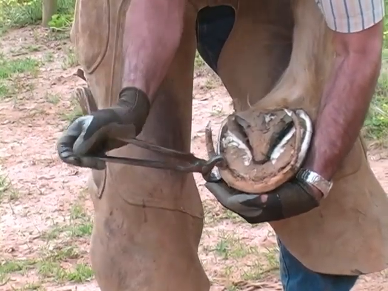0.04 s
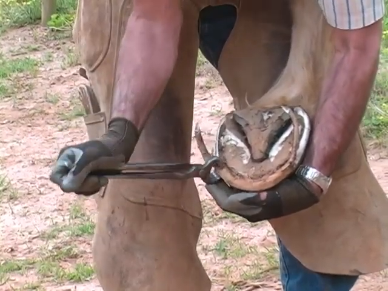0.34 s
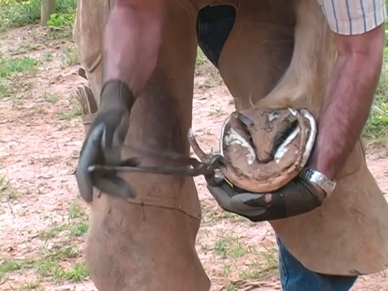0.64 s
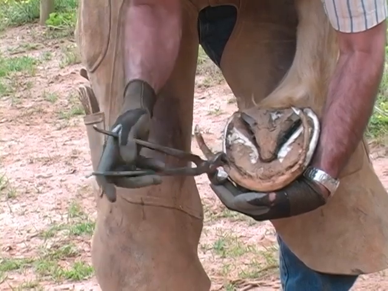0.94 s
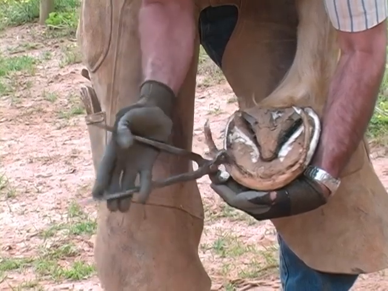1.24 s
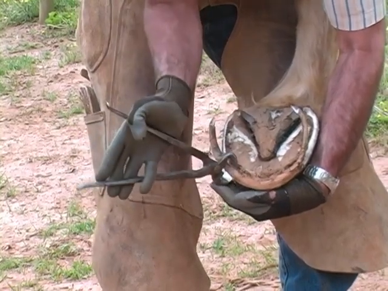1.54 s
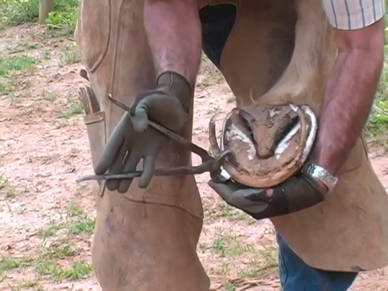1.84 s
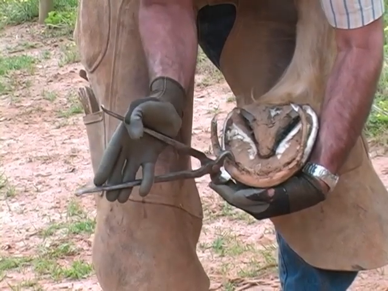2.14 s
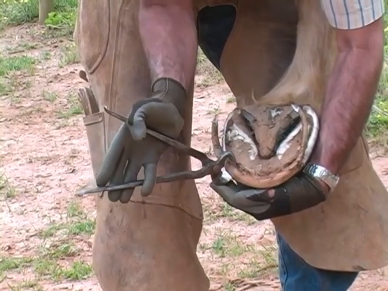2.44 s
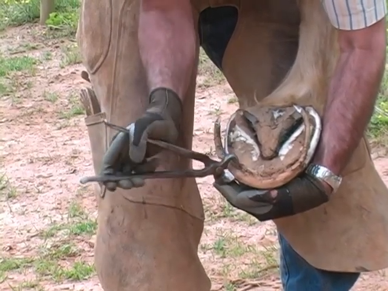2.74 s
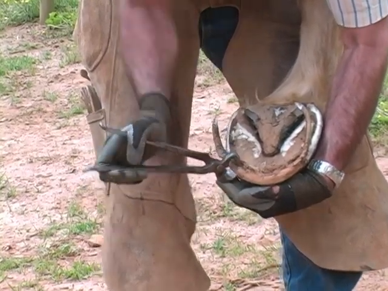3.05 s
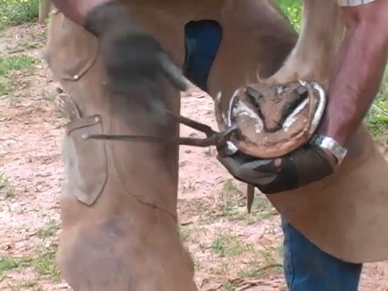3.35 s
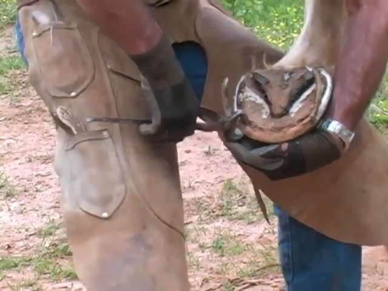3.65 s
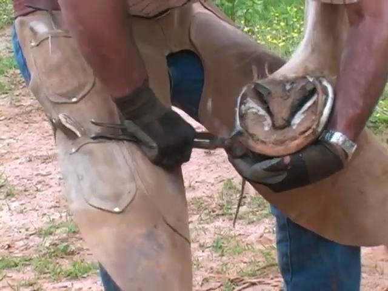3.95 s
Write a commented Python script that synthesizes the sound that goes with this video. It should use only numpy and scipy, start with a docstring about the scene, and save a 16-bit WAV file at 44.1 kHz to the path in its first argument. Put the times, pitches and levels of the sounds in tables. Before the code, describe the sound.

Nippers trim a horse's hoof close by, with a sharp snap at 0.3 seconds. The horn crackles lightly around 1.4 seconds and more strongly around 2.7. Gloves and leather chaps rustle softly and the tool ticks. A bird chirps twice just after 3 seconds. The loudest snap comes at 3.9 seconds, with a brief metallic ring and dull thud. Distant birdsong and a low outdoor rumble lie underneath.

```python
"""An open yard, with the microphone close to a hoof being trimmed with long-handled nippers.
The horn wall snaps twice under the jaws, ringing the tool and jolting the hoof, and crackles as the
jaws are worked in. Gloves and leather chaps rustle and the tool ticks against hoof and hand.
Birds sing in the distance, one chirps nearer, and a low outdoor rumble lies under it all."""
import sys
import numpy as np
from scipy import signal
from scipy.fft import rfft, irfft, next_fast_len
from scipy.io import wavfile
from scipy.ndimage import uniform_filter1d, map_coordinates

SR = 44100
rng = np.random.default_rng(int(sys.argv[2]) if len(sys.argv) > 2 else 0)


def transcribe(signal):
    """Save signal, clipped to [-1, 1], as a 16-bit WAV file at the path in sys.argv[1]."""
    frames = np.atleast_2d(signal).T
    limited = np.clip(frames, -1, 1)
    pcm = np.round(limited * 32767).astype(np.int16)
    wavfile.write(sys.argv[1], SR, pcm)


N = 176400
T = np.arange(N) / SR
HIT_T = np.arange(SR // 8) / SR  # seconds into one hit

# The jaws break through. Each row: start in seconds, level in dB, fracture length in seconds,
# relative ring level in dB, fracture t60 in seconds, relative tail level in dB, tail t60 in seconds.
BITES = [(0.2839, -21, 0.0027, 1, 0.014, -16, 0.04), (3.94, -4.5, 0.0015, -4, 0.0068, -9, 0.019)]


def amp(db):
    """Gain of a level in dB."""
    return 10 ** (np.asarray(db) / 20)


def unit(x):
    """Scaled to rms 1."""
    return x / np.sqrt(np.mean(x ** 2) + 1e-20)


def along(points, hz):
    """(Hz, value) points read on a log axis."""
    freqs, values = np.transpose(points)
    return np.interp(np.log(hz + 1), np.log(freqs + 1), values)


def add(track, start, x):
    """Mix x into the track from start, in seconds."""
    i = max(round(start * SR), 0)
    track[i:i + len(x)] += x[:len(track[i:])]


def wobble(rate):
    """A smooth random curve, rate knots a second."""
    return map_coordinates(rng.standard_normal(int(N * rate / SR) + 4), [T * rate])


def filtered(x, response):
    """x through a gain given as a function of frequency."""
    size = next_fast_len(N + SR // 4)
    return irfft(rfft(x, size) * response(np.fft.rfftfreq(size, 1 / SR)), size)[..., :N]


def panned(x, balance):
    """Stereo x leaned by (Hz, left minus right dB) points."""
    return filtered(x, lambda hz: amp(np.outer([.5, -.5], along(balance, hz))))


def coloured(x, points):
    """A short sound through a causal filter of unit energy, shaped by (Hz, dB) points."""
    n = 2 * len(x)
    gain = unit(amp(along(points, np.fft.rfftfreq(n, 1 / SR))))
    cepstrum = irfft(np.log(gain))
    cepstrum[1:n // 2] *= 2  # fold to minimum phase
    cepstrum[n // 2 + 1:] = 0
    return irfft(rfft(x, n) * np.exp(rfft(cepstrum)))[:len(x)]


def dying(t60):
    """Decay of a hit, 60 dB in t60 seconds."""
    return amp(-60 * HIT_T / t60)


def burst(envelope):
    """Noise under an envelope, evened out so that it holds all frequencies alike."""
    x = rng.standard_normal(len(envelope))
    for _ in range(4):
        phase = np.angle(rfft(x * envelope))
        x = irfft(np.exp(1j * phase), len(x))
    return unit(x * np.sqrt(envelope)) * np.sqrt(np.mean(envelope ** 2))


def ringing(modes):
    """Damped modes, a little different at each blow."""
    return sum(amp(db + rng.normal(0, 1)) * rng.choice([-1, 1]) * dying(t60)
               * np.sin(2 * np.pi * hz * HIT_T) for hz, db, t60 in modes)


def rush(spectrum, likeness):
    """Stereo noise of rms 1, from (Hz, dB) and (Hz, left-right likeness) points."""
    def mid_side(hz):
        angle = np.arccos(np.clip(along(likeness, hz), -1, 1)) / 2
        return amp(along(spectrum, hz)) * [np.cos(angle), np.sin(angle)]
    mid, side = filtered(rng.standard_normal((2, N)), mid_side)
    return unit(np.array([mid + side, mid - side]))


def swells(rows):
    """Bell-shaped strokes joined in one envelope."""
    return np.sqrt(sum((amp(db) * np.exp(-((T - peak) / half) ** 2)) ** 2 for peak, half, db in rows))


def steady(x, window_s=.22):
    """Noise without slow swells: only its quick flutter is left."""
    power = uniform_filter1d(np.mean(x ** 2, axis=0), round(window_s * SR))
    power = uniform_filter1d(power, round(window_s * SR / 2))
    return unit(x / np.sqrt(np.abs(power)))


def echo(x, t60):
    """Diffuse stereo reflections of unit energy."""
    t = np.arange(SR // 2) / SR
    tail = rng.standard_normal((2, len(t))) * amp(-60 * t / t60)
    return signal.fftconvolve(x[None], tail / np.linalg.norm(tail[0]), axes=1)[:, :N]


def snaps():
    """A fracture runs through the horn for a few milliseconds and rings the nippers."""
    # Colour of each bite, and the extra colour of the tails. Each point: frequency in Hz, level in dB.
    horn_colours = [
        [(150, -22), (800, -22), (1150, -31), (1900, 1.5), (2900, -9), (3700, 6), (5500, 9), (7400, 12.5),
         (9500, 6.5), (13000, 8.5), (14200, -5), (15500, -3), (17000, -22)],
        [(150, -31), (1400, -30), (2000, -17), (2900, -9), (3700, -4), (5400, 3.5), (7000, -2.5), (9000, 1),
         (10700, -1), (12600, 7.5), (13400, -12.5), (15300, -7), (17000, -47)],
    ]
    tail_colour = [(200, -10), (1500, 2.5), (5000, 26.5), (9000, 3), (12600, -17), (15000, -10)]
    # Modes of nippers and hoof, one list a bite. Each row: frequency in Hz, level in dB, t60 in seconds.
    bite_modes = [
        [(1365, -9, .022), (1850, -6, .018), (3540, -3, .02), (3775, -3, .022), (5170, 2, .024),
         (5930, -1, .022), (7445, 3, .016), (8275, -1, .014), (8845, 0, .016), (11380, -2, .014),
         (12640, -3, .012)],
        [(640, -20, .035), (800, -18, .035), (970, -15.5, .028), (1975, -14.5, .035), (2620, -11, .02),
         (2930, -18, .02), (3570, -7, .027), (5350, -2.5, .018), (6900, -7, .022), (7995, -7, .03),
         (8462, -8, .03), (8700, -9, .028), (9115, -8, .026), (9670, -6, .028), (11680, 0, .016),
         (12755, 0, .014), (14500, -12, .018)],
    ]
    out = np.zeros(N)
    for bite, colour, modes in zip(BITES, horn_colours, bite_modes):
        start, db, length, ring_db, t60, tail_db, tail_t60 = bite
        tear = burst(np.interp(HIT_T - length, HIT_T, dying(t60)))  # holds while the fracture runs
        tail = amp(tail_db) * coloured(burst(dying(tail_t60)), tail_colour)
        ring = ringing(modes) * (1 - np.exp(-3 * HIT_T / length))
        add(out, start, amp(db) * (coloured(tear + tail, colour) + amp(ring_db) * ring))
    return out


def thuds(push_s=.013):
    """Each snap jolts the hoof: one low push of air and a dull thud."""
    # One jolt a bite. Each row: thud delay in seconds, level in dB, t60 in seconds, push level in dB.
    jolts = [(0.00283, -33.5, 0.043, -49), (.001, -27.5, 0.048, -32)]
    # Colour of the thud. Each point: frequency in Hz, level in dB.
    thud_colour = [(100, -8), (200, 2), (300, -4), (600, -7), (950, 3.5), (1300, -3), (2000, 1),
                   (3000, -1.5), (8000, -40)]
    out, u = np.zeros(N), HIT_T / push_s
    for (start, *_), (delay, db, t60, push_db) in zip(BITES, jolts):
        add(out, start + delay, amp(db) * coloured(burst(dying(t60)), thud_colour))
        add(out, start, amp(push_db) * (1 - u / 2) * np.exp(-u))
    return out


def cracks(scatter_db=-24, scatter_t60=.018):
    """Horn cracks in the jaws: one sharp tick each time and a hollow knock of the hoof."""
    # Each row: start in seconds, tick level in dB, knock level in dB before halving, knock pitch ratio.
    small_cracks = [(0.2925, -20, -50, 1.4), (0.2948, -24, -46, 1.3), (0.2982, -28, -44, 1.4),
                    (1.404, -28, -46, 0.92), (1.428, -30, -37, 0.82), (1.433, -38, -42, 1),
                    (1.461, -27, -37.5, 0.93), (1.469, -32, -53, 0.93), (1.496, -31.5, -40.5, .9),
                    (2.6261, -28, -62, 1), (2.633, -27, -39.5, 1.7), (2.650, -36, -44, 1.7),
                    (2.6564, -19.5, -30, 1.03), (2.6624, -24, -27.5, 1.05), (2.6644, -20, -32, 1.03),
                    (2.6787, -11.5, -25.5, 0.94), (2.696, -41, -64, 1), (2.699, -39, -66, 1),
                    (2.703, -33, -66, 1), (2.707, -29.5, -58, 1), (2.712, -30, -64, 1)]
    # Colour of the tick. Each point: frequency in Hz, level in dB.
    tick_colour = [(200, -10), (1500, -11), (4000, 3), (8000, 3.5), (13000, 4), (16000, -11)]
    # Modes of the hoof. Each row: frequency in Hz, level in dB, t60 in seconds.
    hoof_modes = [(270, -33, .035), (430, -21, 0.033), (570, -6, 0.025), (835, 1.5, 0.018),
                  (1025, -11.5, 0.033), (1370, -0.5, 0.022), (1950, -11, 0.018), (2680, -4.5, 0.0059)]
    out = np.zeros(N)
    for start, tick_db, knock_db, pitch in small_cracks:
        scatter = amp(scatter_db) * dying(scatter_t60) * rng.standard_normal(len(HIT_T))
        tick = coloured((HIT_T == 0) + scatter, tick_colour)
        knock = ringing([(hz * pitch, db, t60) for hz, db, t60 in hoof_modes])
        add(out, start, amp(tick_db) * tick + .5 * amp(knock_db) * knock)
    return out


def taps(half_width_octaves=.49):
    """The tool scrapes briefly against hoof and hand, each contact around its own pitch."""
    # Each row: start in seconds, level in dB, centre in Hz, t60 in seconds.
    contacts = [(0.44, -51.5, 8900, 0.046), (0.539, -50, 6500, 0.023), (.6285, -44, 3420, 0.037),
                (0.692, -50, 3650, 0.088), (1.4298, -46, 5200, 0.023), (1.463, -45.5, 4700, 0.02),
                (2.059, -56.5, 2380, 0.044), (2.109, -49, 2820, 0.032), (3.46, -49.5, 6000, 0.079),
                (3.475, -47, 3300, 0.082), (3.6837, -40, 3800, 0.024), (3.707, -57, 6000, .02),
                (3.7362, -40.5, 10300, 0.043), (3.755, -49, 9000, .015), (3.915, -37.5, 5700, .03),
                (3.919, -39, 5730, 0.025), (3.9369, -28, 8000, 0.033), (3.9793, -35, 2920, .008)]
    out, hz = np.zeros(N), np.geomspace(100, SR / 2, 40)
    for start, db, centre, t60 in contacts:
        band_db = -10 * np.log10(1 + (np.log2(hz / centre) / half_width_octaves) ** 4)
        add(out, start, amp(db) * coloured(burst(dying(t60)), np.c_[hz, band_db]))
    return out


def rustle(grain_db=3, grains_per_s=450, specks_per_s=520):
    """Grainy rubbing of gloves with specks of grit, and the duller shuffling of the chaps."""
    # Each row: peak time and half length in seconds, level in dB; rubs add a relative grit level in dB.
    rubs = [(0.336, 0.05, -57, -5), (0.518, 0.063, -58, -7), (0.684, 0.039, -58.5, -6),
            (0.854, 0.059, -54.5, -2), (1.001, 0.029, -56.5, -6), (1.112, 0.039, -59.5, -4),
            (1.18, .008, -57, -1), (1.286, 0.018, -56, -9), (1.464, 0.11, -60.5, -3),
            (1.913, 0.037, -61.5, -3), (2.335, 0.019, -62, -5), (2.677, 0.037, -57, 0),
            (3.164, 0.034, -53.5, -6), (3.47, 0.17, -60, -9), (3.66, 0.049, -55, 0.5),
            (3.72, 0.11, -56.5, -9), (3.957, 0.04, -46, -9), (3.995, 0.0098, -40, -3)]
    shuffles = [(.34, 0.036, -75), (.85, 0.15, -60.5), (1.46, 0.16, -59.5), (3.45, 0.16, -55.5),
                (3.7, 0.095, -50.5), (3.92, 0.013, -48)]
    # Colours of the three sounds. Each point: frequency in Hz, level in dB.
    glove_colour = [(150, -20), (500, -7), (1200, -4.5), (2200, 2), (4500, 7), (7500, 5.5), (12500, 2),
                    (15500, -41)]
    grit_colour = [(200, -16), (1500, 0), (4000, -1), (7000, 7), (9000, -13), (12500, 4), (14500, 2),
                   (16000, -9)]
    chaps_colour = [(120, -2), (300, -3.5), (500, -1), (1100, -4), (2000, -7.5), (5000, -11), (12000, -29)]
    grain = unit(amp(grain_db * wobble(grains_per_s)))
    specks = (rng.random(N) < specks_per_s / SR) * rng.uniform(-1.1, 1, N)
    grit = unit(filtered(specks, lambda hz: amp(along(grit_colour, hz))))
    gloves = swells([row[:3] for row in rubs]) * grain * rush(glove_colour, likeness=[(1000, .8)])
    scratch = swells([(peak, half, db + grit_db) for peak, half, db, grit_db in rubs]) * grit
    chaps = swells(shuffles) * grain * rush(chaps_colour, likeness=[(1000, .9)])
    return gloves + scratch + chaps


def whistle(length, pitches, warble):
    """One slightly unsteady bird note, gliding through three pitches."""
    u = np.linspace(0, 1, round(length * SR))
    glide = np.polyval(np.polyfit([0, .5, 1], pitches, 2), u)
    waver = map_coordinates(rng.standard_normal(64), [u * length * 350])
    phase = 2 * np.pi * np.cumsum(glide * (1 + warble * waver)) / SR
    return unit(np.sin(phase) * np.abs(np.sin(np.pi * u)) ** .5)


def birds(flutter_db=1.6):
    """Distant song, blurred by the trees, and two chirps nearer the microphone."""
    # Far song. Each row: start and length in seconds, first, middle and last pitch in Hz,
    # level in dB before the mix.
    notes = [(0.069, 0.03, 4600, 4480, 4300, -64), (.08, 0.048, 7300, 6850, 6500, -66),
             (.085, 0.033, 2900, 2940, 2770, -65.5), (0.145, 0.11, 4150, 4340, 4650, -60),
             (0.153, 0.06, 2600, 2660, 2720, -57.5), (0.206, 0.054, 2720, 2800, 2330, -58),
             (0.404, 0.07, 4750, 4150, 3770, -63.5), (0.722, 0.06, 5000, 4740, 4790, -56.5),
             (0.777, 0.055, 4780, 4770, 4850, -64), (0.937, 0.065, 3900, 3550, 2950, -61.5),
             (1.013, 0.1, 2850, 3060, 3850, -62.5), (1.114, 0.03, 3700, 4400, 5440, -57),
             (1.144, 0.018, 5300, 5020, 4700, -57), (1.315, 0.038, 3300, 4100, 5440, -58.5),
             (1.368, 0.032, 5100, 3980, 3330, -63), (1.55, .05, 3450, 4200, 5400, -59.5),
             (1.608, .045, 5100, 3830, 3350, -66), (1.755, 0.1, 6100, 5980, 5950, -68),
             (1.873, 0.078, 5200, 4150, 4550, -60), (2.039, .022, 5700, 5000, 4700, -61),
             (3.396, 0.032, 5100, 4650, 4200, -59), (3.555, 0.032, 3900, 4600, 5400, -54),
             (3.614, 0.035, 3300, 3280, 2710, -57), (3.706, 0.027, 4300, 4800, 5750, -49),
             (3.77, 0.028, 3300, 3250, 2670, -54.5), (3.829, .013, 4900, 4260, 3900, -55.5),
             (3.855, 0.034, 4150, 5000, 5650, -49)]
    # The nearer bird. Each row: start in seconds, level in dB.
    chirps = [(3.02, -46), (3.157, -46)]
    # Its two-voiced chirp. Each row: delay and length in seconds, three pitches in Hz, relative dB.
    chirp_parts = [(0, 0.0262, 2450, 3150, 3050, -3.5), (.003, 0.0262, 2250, 2170, 1720, -6),
                   (.026, 0.0174, 3000, 2400, 1980, 0.5), (0, 0.038, 4900, 4330, 3500, -15)]
    song, near = np.zeros((2, N))
    for start, length, *pitches, db in notes:
        add(song, start, amp(db) * whistle(length, pitches, warble=.008))
    song *= amp(flutter_db * wobble(120))
    for start, db in chirps:
        for delay, length, *pitches, part_db in chirp_parts:
            add(near, start + delay, amp(db + part_db) * whistle(length, pitches, warble=.021))
    trees = echo(amp(-3.2) * song + amp(-7) * near, t60=.31)
    return amp(-2) * song + near + trees


def outdoors(air_db=-48.5, rumble_top_hz=260, patchy_db=1.3, hum_db=-55, hum_hz=138, hum_width_hz=6):
    """Steady low rumble with a wavering hum and a faint, patchy hiss."""
    # The open air. Each point: frequency in Hz, then in turn level in dB, left-right likeness,
    # or left minus right in dB.
    air_colour = [(15, -23), (25, -32), (45, -7.5), (70, -4.5), (105, -1.5), (170, -6), (250, -16),
                  (320, -16.5), (450, -20.5), (700, -22.5), (1100, -21.5), (1700, -29.5), (3000, -29),
                  (3800, -30), (4800, -26), (6500, -32.5), (12500, -37), (16000, -44.5)]
    likeness = [(30, 0.85), (70, 1), (140, 0.65), (300, 0.8), (700, 0.39), (1500, 0.37), (4000, 0.28),
                (9000, 0.067), (12000, 0.96)]
    balance = [(30, 6), (70, -2), (140, -2.3), (280, -0.5), (550, -0.5), (1200, 1), (8000, -0.5)]
    air = rush(air_colour, likeness)
    rumble = filtered(air, lambda hz: hz < rumble_top_hz)
    hiss_frames = signal.stft(air - rumble, nperseg=512)[2]
    patches = uniform_filter1d(rng.standard_normal(hiss_frames.shape[1:]), size=8, axis=0)  # in pitch
    patches = uniform_filter1d(patches, size=16, axis=1)  # and in time
    hiss = signal.istft(hiss_frames * amp(patchy_db * unit(patches)), nperseg=512)[1][:, :N]
    white = rush([(100, 0)], likeness)
    hum = steady(filtered(white, lambda hz: 1 / (1 + ((hz - hum_hz) / hum_width_hz) ** 2)))
    bed = amp(air_db) * (rumble.std() * steady(rumble) + hiss) + amp(hum_db) * hum
    return panned(bed, balance)


def scene():
    """The tool works close to the microphone, in an open yard."""
    # Stereo image of the tool. Each point: frequency in Hz, then side against centre in dB (width)
    # or left minus right in dB (balance).
    width = [(150, -10), (600, -12), (1300, -13), (5000, -15), (9000, -14), (12000, -26)]
    balance = [(150, -2), (600, -0.5), (1200, 2.5), (2500, 0), (5000, 1), (11000, -1)]
    tool = snaps() + thuds() + cracks() + taps()
    side = filtered(tool, lambda hz: -1j * amp(along(width, hz)))  # a quarter cycle behind
    close = panned(np.array([tool + side, tool - side]), balance)
    yard = amp(-17.5) * echo(tool, t60=.1)
    return close + yard + rustle() + birds() + outdoors()


def record(dry, top_hz=16000):
    """The loudest snap overloads the recorder, which keeps nothing above its band limit."""
    return filtered(np.clip(dry, -1, 1), lambda hz: 1 / np.sqrt(1 + (hz / top_hz) ** 120))


dry = scene()
out = record(dry)
transcribe(out)
```